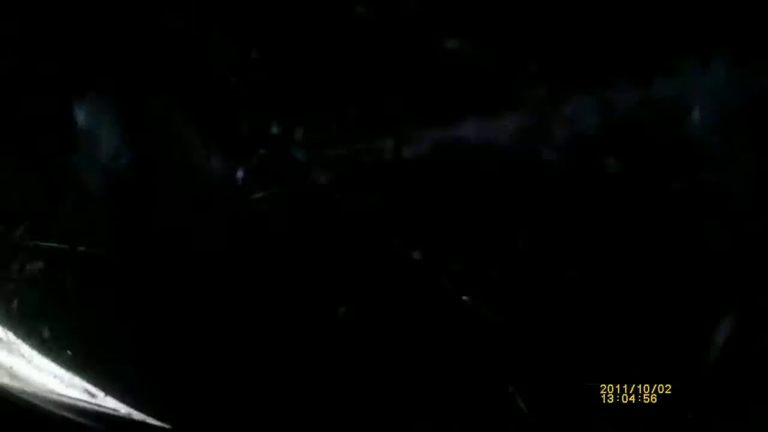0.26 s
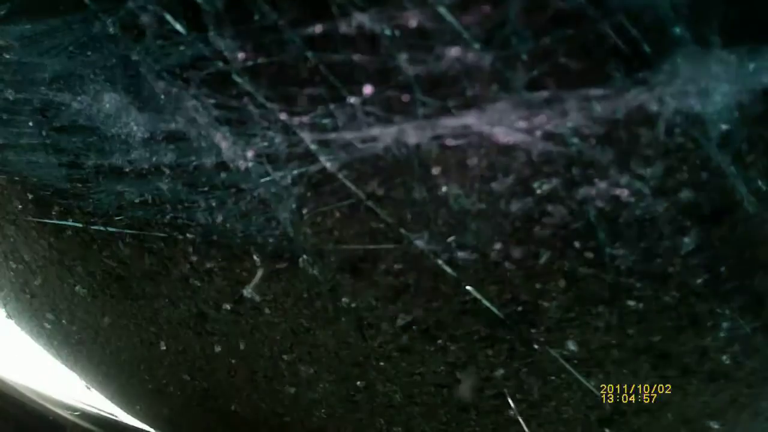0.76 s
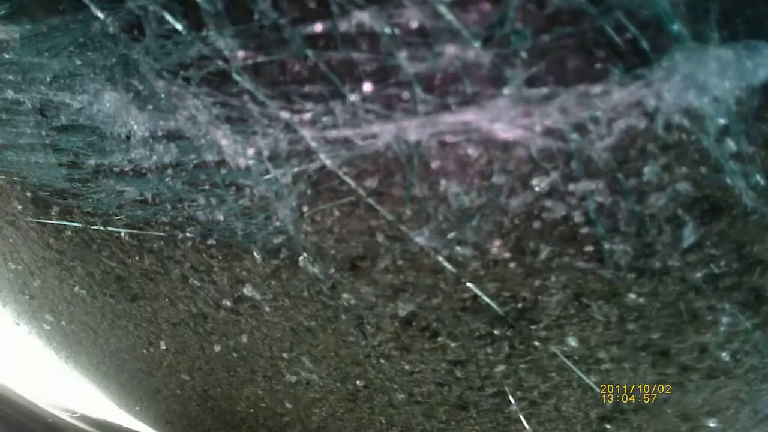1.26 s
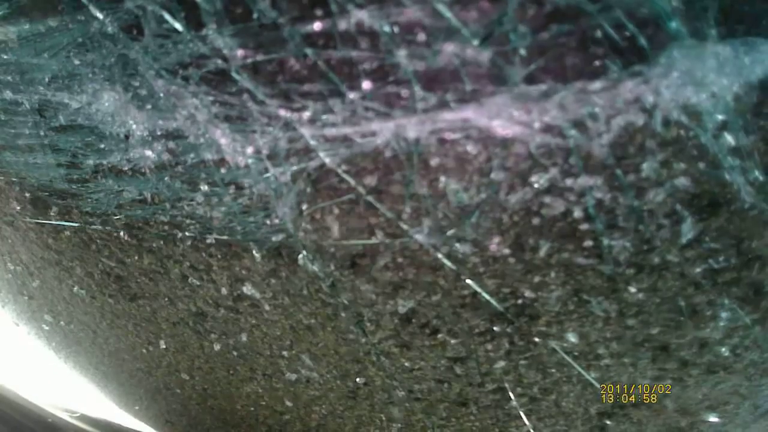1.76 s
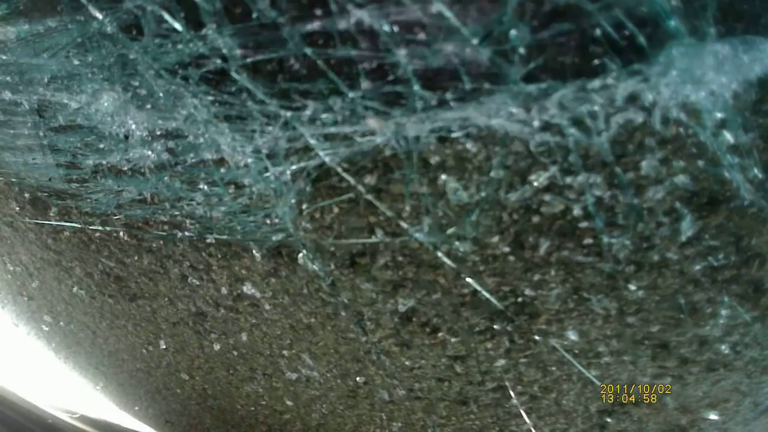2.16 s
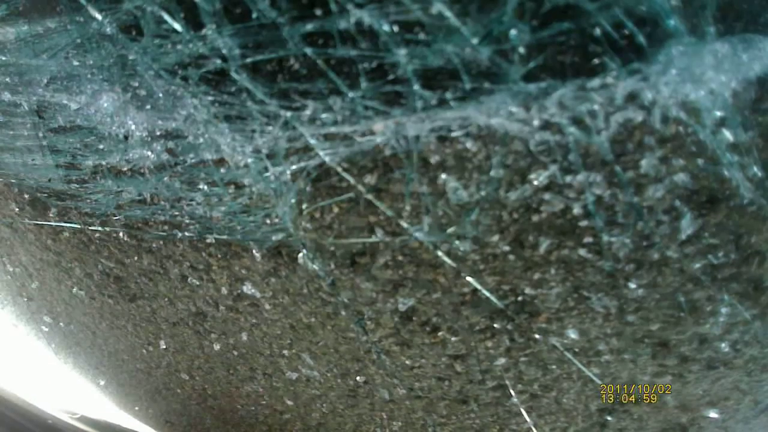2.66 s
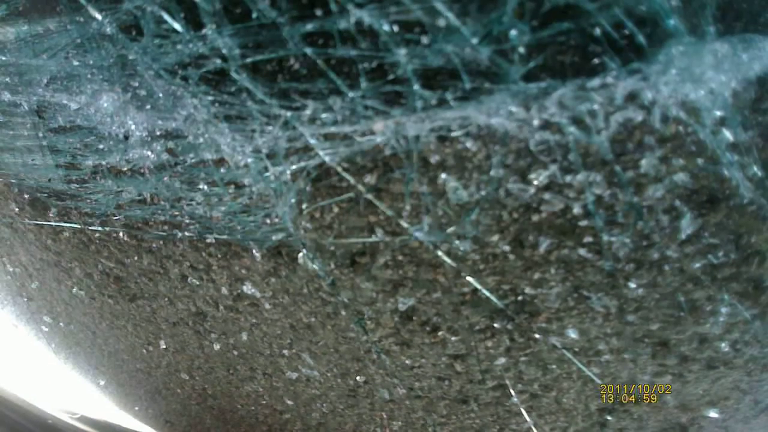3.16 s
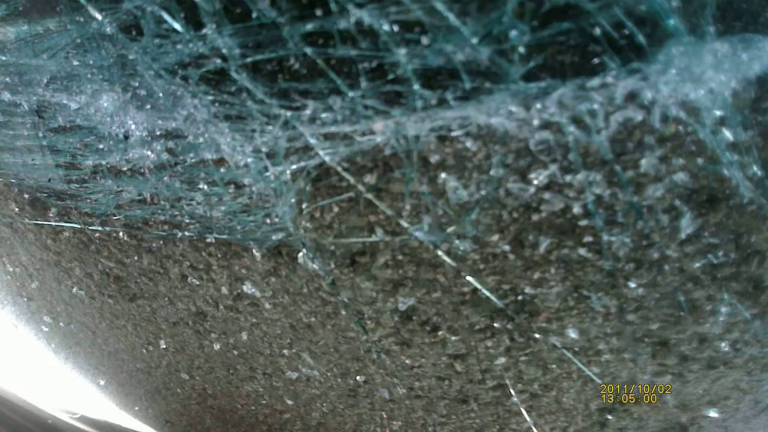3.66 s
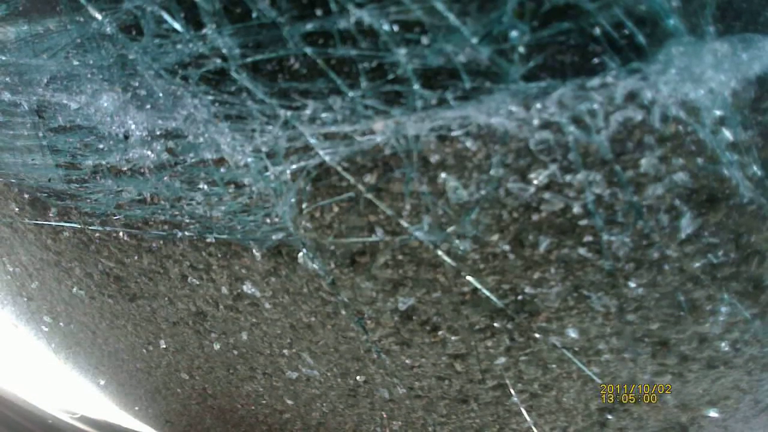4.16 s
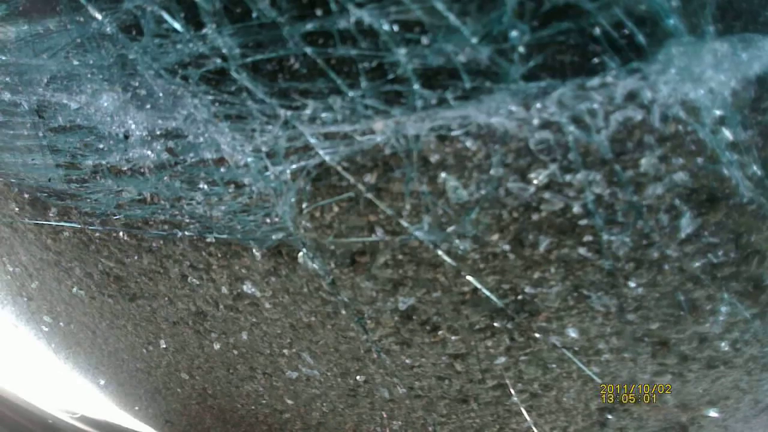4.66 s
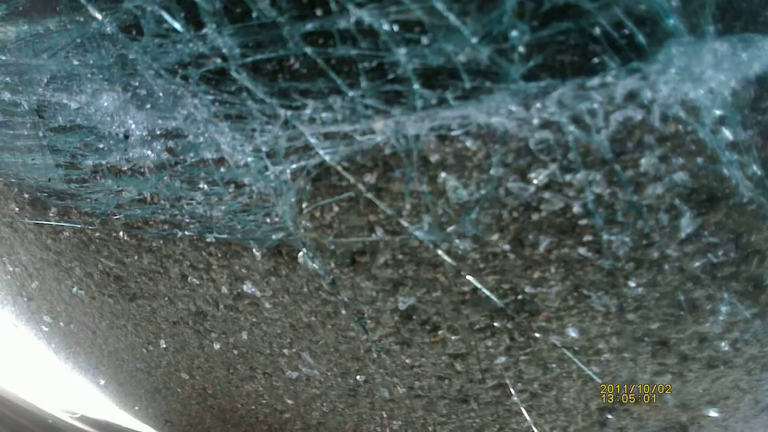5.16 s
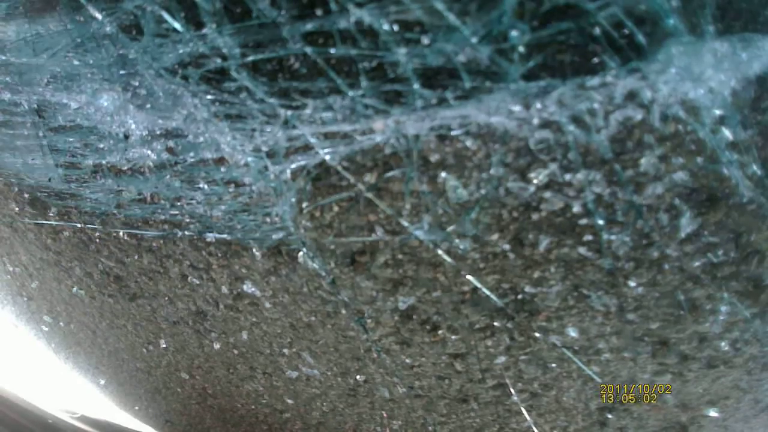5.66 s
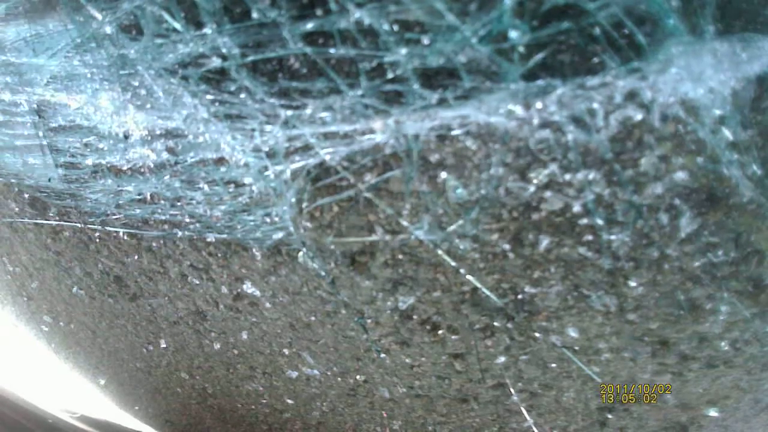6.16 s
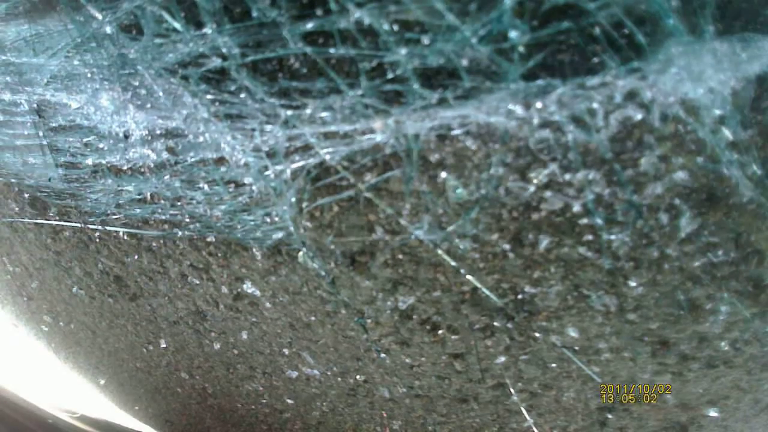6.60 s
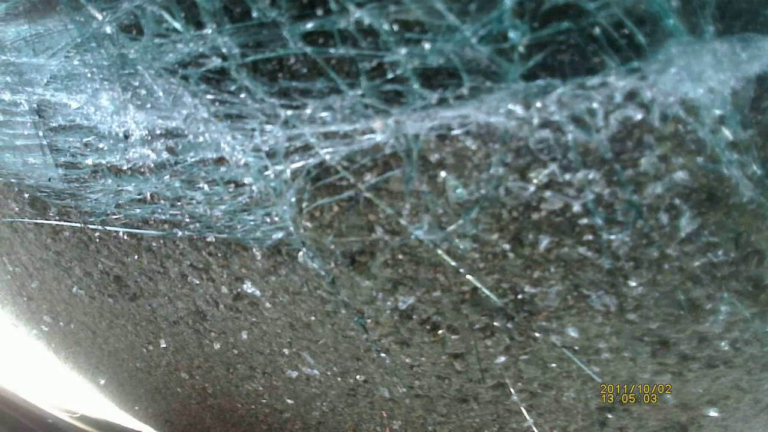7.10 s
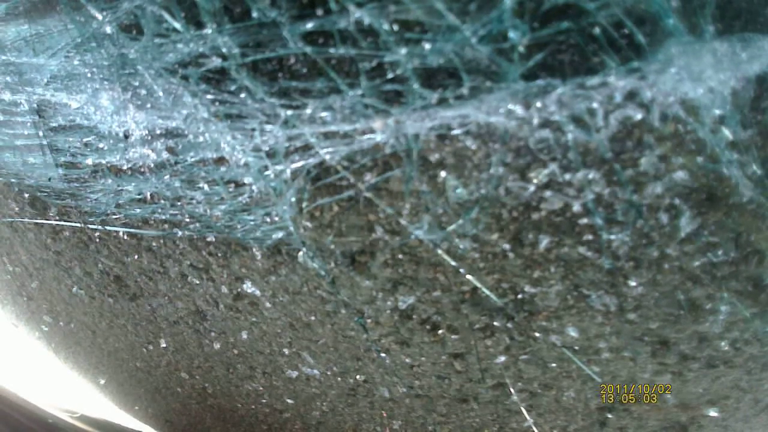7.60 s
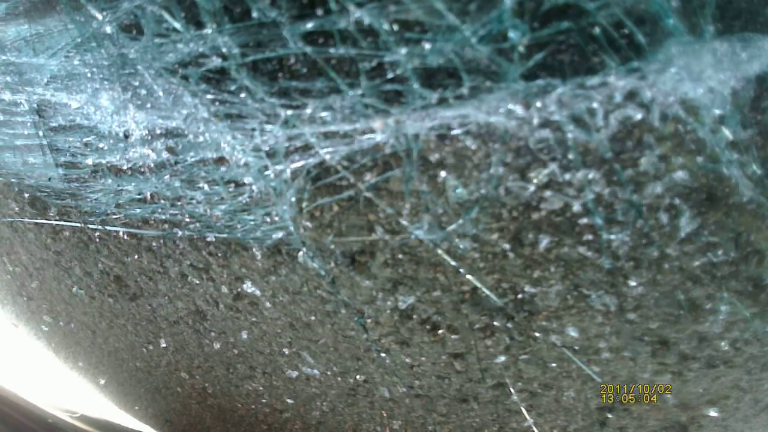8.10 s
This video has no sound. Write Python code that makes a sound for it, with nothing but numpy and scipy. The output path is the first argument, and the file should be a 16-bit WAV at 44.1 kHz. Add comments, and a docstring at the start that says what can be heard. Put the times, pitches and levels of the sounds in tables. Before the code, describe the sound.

A car crashes and grinds harshly along the road, overloading the microphone, then stops as glass trickles and bodywork crunches in distorted bursts.

```python
"""Car crash heard from the cabin

A crashing car grinds along the road and stops: random fractures, filtered by the body, follow its speed.
The wreck crunches in fits of fractures and knocks as damped swings; glass and trim crack as noise and rings.
Glass ticks trickle over a noise wash. The microphone overloads: the crash pins it to one rail, and
loud crunches clip.
"""
import sys
import numpy as np
from scipy import signal
from scipy.fft import rfft, irfft
from scipy.io import wavfile
from scipy.ndimage import uniform_filter1d

SR = 44100
rng = np.random.default_rng(int(sys.argv[2]) if len(sys.argv) > 2 else 0)


def wrap_up_sound(samples):
    """Save the sound to the file named by the first command line argument, as 16-bit audio."""
    columns = np.atleast_2d(samples).T
    # keep every value between -1 and 1, then stretch to whole-number steps
    tamed = np.clip(columns, -1, 1)
    steps = np.round(tamed * 32767).astype(np.int16)
    wavfile.write(sys.argv[1], SR, steps)


N = 367794
TIME = np.arange(N) / SR
STOP_S = 1.693  # the car comes to rest

# Spectrum of rasping torn edges. Each row: frequency in Hz, relative density in dB per Hz.
RASP = [(600, -28), (1200, -12), (1700, -1), (2300, 0), (2800, -1), (3500, -7), (5000, -20), (9000, -50)]
# Spectrum of snapping trim and chips. Each row: frequency in Hz, relative density in dB per Hz.
SNAP = [(30, -12), (100, -24), (300, -8), (700, -4), (1200, 5.5), (1800, -5), (2800, -4), (4000, -26.5),
        (8000, -33)]
# Spectrum of breaking glass. Each row: frequency in Hz, relative density in dB per Hz.
GLASS = [(500, -30), (2000, -14), (3300, -4), (4400, -7), (5700, 0), (7000, -6), (8200, -13), (11000, -60)]
# Resonances of the cabin shell. Each row: centre in Hz, width in Hz, lift in dB.
SHELL = [(700, 60, 4), (905, 80, 5.5), (1160, 120, 3), (2560, 160, 2), (5600, 600, 2.5)]


def slide():
    """Road grit tears at the sliding body in quick uneven catches; torn edges rasp in surges."""
    # Spectrum of the grinding body. Each row: frequency in Hz, relative density in dB per Hz.
    grind_spectrum = [(25, -7.5), (100, -13), (250, -7.5), (600, 0), (1200, 3.5), (1700, -2.5),
                      (2800, -7.5), (4000, -12.5), (5600, -6.5), (7200, -14.5), (8500, -17), (11000, -47.5)]
    grit = shifting(grains(per_s=6000, spread_db=3), patchy_db=1.5)
    catches = amp(3.9 * wander(hz=72.5))
    edges = shifting(grains(per_s=2500, spread_db=3), patchy_db=2.5)
    surges = amp(3 * wander(hz=25))
    body = colour(grit * catches, grind_spectrum, SHELL)
    rasp = amp(-2.5) * colour(unit(edges * surges), RASP)
    return unit(cabin(body + rasp, t60=0.029, wet_db=-4)) * (impact_level() + slide_level())


def impact_level():
    """The first blow crushes the body at full force until the car bounces clear."""
    impact_s, impact_db, bounce_db_per_s = 0.17, 2, 594
    return amp(impact_db - bounce_db_per_s * np.clip(TIME - impact_s, 0, 1))


def slide_level():
    """Grinding follows road load and a power of the evenly falling speed; loose debris scrapes on."""
    land_s, bear_down_s, land_db, slide_db = 0.287, 0.19, -8, 6  # land_db: load at landing, rising to 0
    brake_s, speed_power = 0.32, 1.78
    debris_db, debris_db_per_s = -20.5, 12  # falls only after the stop
    load_db = land_db * np.clip(1 - (TIME - land_s) / bear_down_s, 0, 1)
    speed = np.clip((STOP_S - TIME) / (STOP_S - brake_s), 0, 1)
    grinding = amp(slide_db + load_db) * speed ** speed_power
    debris = amp(debris_db - debris_db_per_s * np.maximum(TIME - STOP_S, 0))
    return (TIME > land_s) * np.hypot(grinding, debris)


def crunches():
    """Clumps of fractures ring the shell and one panel as the wreck shifts; edges rasp and glass splinters."""
    # Fits of crunching bodywork. Each row: start in seconds, swell in seconds, hold in seconds,
    # load in dB before overload, panel ring in Hz, ring lift in dB, rasp gain in dB, splinter gain in dB.
    crunch_rows = [ (0.635, 0.0077, 0.06, 4.5, 2770, -3, -18, -8),
                   (0.94, 0.024, 0.027, -13, 1710, 7, -5, -12),
                   (1.055, 0.013, 0.082, -11, 2170, 15, -1, -2),
                   (1.234, .012, 0.012, -7.5, 2900, 4, -4, 1.5),
                   (1.31, 0.011, 0.023, -18, 2000, 21, -2, -2), (1.577, 0.018, .004, -8, 1140, 1, -9, -6),
                   (2.083, 0.0081, 0.006, -13, 1220, 12, -25, -16),
                   (2.886, 0.012, 0.0095, -11.5, 520, 7, -4.5, -3.5),
                   (4.513, 0.089, 0.044, 2.5, 690, 6.5, -18, -11),
                   (4.743, .005, 0.021, -7.5, 2212, 11, -4.5, -9),
                   (4.823, 0.039, 0.11, -17.5, 1000, -3, -10, -4),
                   (5.006, 0.017, 0.094, -2.5, 960, 1, -17, -3.5),
                   (5.098, 0.074, 0.089, 0.5, 2180, 6, -5, -7.5), (5.282, 0.07, .018, -3, 950, -2, -6, -1),
                   (5.898, 0.08, 0.13, -24, 1000, 1, -6, -5), (6.061, .009, 0.04, -4.5, 1010, 9, -9, -33),
                   (6.098, 0.05, 0.073, 3, 1700, 0, -5, -16), (6.217, .015, 0.044, 2.5, 1150, 7, -21, -23),
                   (6.304, 0.016, 0.021, 0.5, 3200, 2, -7, -3.5),
                   (6.4, .015, 0.13, -27.5, 1150, 1, -4.5, -17),
                   (6.759, 0.0037, 0.0044, 2.5, 940, 4, -11, -8),
                   (6.787, 0.013, 0.057, 2, 936, 12, -6.5, -30), (6.869, 0.026, 0.027, 2, 2400, 2, -5, -16),
                   (6.921, 0.016, 0.046, -3, 1250, 3, -10, -36),
                   (7.048, 0.0038, 0.032, 3.5, 480, 7, -20, -33),
                   (7.101, 0.029, 0.062, -16.5, 890, -7, -2, -5),
                   (7.289, 0.01, 0.061, -4.5, 890, 6.5, -7.5, -32),
                   (7.398, 0.0085, 0.063, -12.5, 776, 8, -8, -32),
                   (7.485, 0.01, 0.015, -11.5, 2770, 9, -4, -32),
                   (7.719, 0.015, 0.06, -12, 850, 5, -15, -30), (7.878, .005, 0.013, -7, 1290, 8, -22, -29),
                   (7.935, 0.0057, 0.0066, -5, 1065, 13, -28, -31)]
    # Spectrum of crunching bodywork. Each row: frequency in Hz, relative density in dB per Hz.
    crunch_spectrum = [(25, -21), (100, -15.5), (180, -5), (300, -2.5), (600, -1.5), (1200, 2), (1700, -4),
                       (2700, -8), (4000, -23), (5600, -15.5), (7200, -34), (8500, -20), (11000, -71)]
    # Spectrum of the booming shell. Each row: frequency in Hz, relative density in dB per Hz.
    boom_spectrum = [(20, 3), (60, -9.5), (110, -4), (250, -22), (1000, -71)]
    # load builds, holds while a panel gives way, then dies
    swell_db, release_db_per_s, boom_db = 23.5, 482, -22.5
    out = np.zeros(N)
    breaks = shifting(grains(per_s=1500, spread_db=3.5), patchy_db=2)
    edges = shifting(grains(per_s=900, spread_db=3.5), patchy_db=2.5)
    splinters = grains(per_s=420, spread_db=2.5)
    boom = unit(colour(rng.standard_normal(N), boom_spectrum))
    # metal sticks and slips, so all three kinds of fracture come in the same spurts
    slips = unit(amp(3.9 * wander(hz=73.5)))
    for s, swell_s, hold_s, db, ring_hz, lift_db, rasp_db, splinter_db in crunch_rows:
        span = (TIME >= s) & (TIME < s + swell_s + hold_s + 0.15)
        t = TIME[span] - s
        rise_db = -swell_db * np.maximum(1 - t / swell_s, 0)
        fall_db = -release_db_per_s * np.maximum(t - swell_s - hold_s, 0)
        load = amp(db + rise_db + fall_db)
        force = slips[span] * load
        panel = (ring_hz, 0.12 * ring_hz, lift_db)
        body = colour(breaks[span] * force, crunch_spectrum, SHELL + [panel])
        rasp = amp(rasp_db) * colour(edges[span] * force, RASP)
        # more force brings disproportionately more glass, growing with force to the power 1.52
        glass = amp(splinter_db) * colour(splinters[span] * force ** 1.52, GLASS)
        add(out, s, body + rasp + glass + amp(boom_db) * boom[span] * load)
    return cabin(out, t60=0.14, wet_db=-8.5)


def cracks():
    """Glass and trim: a sharp snap, a dying noise spray, a brief ring of close modes and a soft thud."""
    # Each row: start in seconds, strength in dB (scales every part), lowest ring in Hz,
    # treble gain in dB before a 5 dB cut, t60 in seconds of the spray.
    crack_rows = [(1.216, 9, 1920, -8, 0.031), (1.243, -3, 5800, -10.5, 0.046),
                  (1.319, -5, 1870, -23, .055), (1.398, -2.5, 2670, -10, .07), (1.453, -8, 5780, -6, .067),
                  (1.493, 3, 2800, -21, 0.022), (1.537, 2, 2640, -12.5, 0.041),
                  (1.596, 11.5, 2640, -9, 0.04), (1.674, -1.5, 1470, -8.5, 0.18),
                  (1.773, -6, 2120, -13, 0.06), (1.909, 1, 1140, -15, 0.064), (1.994, -2, 1510, -24, 0.046),
                  (2.037, -4, 3200, -11.5, 0.12), (2.092, -2, 1300, -12, 0.027),
                  (2.141, -4, 1710, -13.5, 0.12), (2.59, -10, 1630, -6.5, 0.031),
                  (2.71, -3.5, 2760, -10.5, 0.075), (2.76, -10, 2130, -13, 0.06),
                  (2.84, 1, 2010, -25, 0.062), (2.858, -16, 1950, -4.5, 0.081),
                  (2.965, 2.5, 2545, -12, 0.036), (3.126, -8.5, 2600, -11, .044),
                  (3.174, 8, 2060, -22, 0.052), (3.263, -11.5, 2470, -5, 0.091),
                  (3.319, -5.5, 2360, -13, 0.035), (3.592, -10, 1830, -15, 0.046),
                  (3.654, 0.5, 3360, -11.5, 0.027), (3.739, -11.5, 2650, -9, .062),
                  (3.918, -10, 2600, -6.5, 0.024), (4.104, -14, 2530, -6, 0.14),
                  (4.165, -4, 3020, -13, 0.03), (4.359, -21, 1660, 3, 0.039),
                  (4.751, -0.5, 1950, -15, 0.069), (5.023, 12, 2550, -29, 0.048),
                  (5.525, -6, 2810, -17, 0.063), (5.684, -15, 3470, -20, .055),
                  (6.388, 8, 1450, -16.5, 0.061), (6.657, -5, 2610, -10, 0.075),
                  (6.676, 1.5, 3050, -10, 0.052), (7.169, -7, 2000, -8, 0.06),
                  (7.297, 8.5, 2650, -34, 0.12), (7.504, -2.5, 2430, -29, .055),
                  (7.721, -0.5, 1600, -28, 0.086), (7.795, 11, 2380, -28, 0.03),
                  (7.886, 11.5, 1710, -34, 0.089), (7.943, 6, 1570, -36, 0.05),
                  (8.141, 5, 1800, -19, 0.019), (8.203, -4.5, 1720, -18, 0.056),
                  (8.254, 10, 6040, -4.5, 0.013)]
    # small shards ring more clearly: ring gain at 0 dB strength, before an 11 dB cut, and its slope
    base_ring_db, ring_db_per_db = -13, -0.43
    thud_hz, thud_db, thud_t60_s = 65, -26.5, 0.026
    dull, bright, rings = np.zeros((3, N))
    t = TIME[:SR // 5]
    snap = 1 + 1.6 * np.exp(-t / 0.0025)
    thud = amp(thud_db - 60 * t / thud_t60_s) * np.sin(2 * np.pi * thud_hz * t)
    for s, db, hz, treble_db, t60 in crack_rows:
        attack = 1 - np.exp(-t / 0.0003)
        fade = amp(db - 60 * t / t60) * attack
        spray = rng.standard_normal((2, len(t))) * fade * snap
        add(dull, s, amp(-11.5) * spray[0])
        add(bright, s, amp(treble_db - 5) * spray[1])
        # a jagged shard rings with a cluster of close modes
        cluster_hz = hz * rng.uniform(1.0, 1.2, size=(8, 1))
        modes = np.sin(2 * np.pi * cluster_hz * t).sum(axis=0)
        ring_db = min(base_ring_db + ring_db_per_db * db, 0) - 11
        add(rings, s, amp(ring_db) * fade * np.exp(-t / 0.03) * modes)
        add(rings, s, amp(db) * thud)
    pieces = colour(dull, SNAP, SHELL) + colour(bright, GLASS) + rings
    return cabin(pieces, t60=0.059, wet_db=-7)


def thumps():
    """Heavy parts knock: damped swings of panels, unsteady in pitch, with a weaker upper mode."""
    # Each row: start in seconds, initial level of the main swing in dB, mean ring in Hz.
    thump_rows = [(1.245, -9, 346), (2.906, -9, 429), (4.61, 4, 442), (5.025, 0, 459), (5.235, 0.5, 669),
                  (6.108, 2.5, 533), (6.929, 0, 416.6), (7.085, 2.5, 606), (7.11, -2.5, 351),
                  (7.45, -8, 333), (7.887, -17, 69)]
    t60_s = 0.2
    out = np.zeros(N)
    rattle = 1 + 0.2 * wander(hz=140)
    for s, db, hz in thump_rows:
        turns = np.cumsum(hz * rattle[round(s * SR):][:SR // 3]) / SR
        swing = np.sin(2 * np.pi * turns) + 0.25 * np.sin(2 * np.pi * 1.4 * turns)
        add(out, s, amp(db - 60 * TIME[:len(turns)] / t60_s) * swing)
    return out


def stray_chips():
    """Single chips of glass drop: sparse fractures excite the glass spectrum and a broad resonance."""
    per_s, rms_db = 27, -44
    ticks = colour(grains(per_s=per_s, spread_db=-5), GLASS, [(3400, 2600, 9.4)])
    return amp(rms_db) * unit(cabin(ticks, t60=0.031, wet_db=12))


def trickle_level():
    """Crumbs thin out after the stop to a steady trickle, and now and then spill; powers add."""
    # Handfuls of crumbs. Each row: middle in seconds, half length in seconds, level in dB before the mix.
    spill_rows = [(2.39, 0.045, -26.5), (3.243, 0.05, -27), (4.106, 0.092, -37), (5.45, 0.1, -31),
                  (6.6, 0.41, -33), (7.193, 0.12, -24)]
    steady_db, fresh_db, fall_db_per_s = -37, -28, 15  # before the mix
    fresh = amp(fresh_db - fall_db_per_s * np.maximum(TIME - STOP_S, 0))
    spills = sum(amp(db) ** 2 * np.exp(-((TIME - s) / half_s) ** 2) for s, half_s, db in spill_rows)
    return np.sqrt(amp(steady_db) ** 2 + fresh ** 2 + spills)


def bed():
    """A noise wash fills the cabin while fractures filtered as glass crumbs and chips keep ticking."""
    # Spectrum of the wash. Each row: frequency in Hz, relative density in dB per Hz.
    wash_spectrum = [(24, -68), (40, -21.5), (113, -19), (148, -3), (185, -11.5), (236, -5), (336, -5.5),
                     (367, -6), (419, -2), (653, -3.5), (872, -1), (1390, -9), (2260, -15), (3520, -23),
                     (8000, -32.5), (10400, -34.5), (17600, -120)]
    # Resonances that colour the wash. Each row: centre in Hz, width in Hz, lift in dB.
    wash_modes = [(900, 90, 2), (1170, 120, 2), (5650, 650, 5)]
    # Common level of wash and chips. Each row: time in seconds, level in dB before their mix gains.
    wash_level = [(2.4, -21), (3.6, -22.5), (4.9, -21), (5.8, -22.5), (6.7, -19.5), (8.3, -21.5)]
    noise = colour(rng.standard_normal(N), wash_spectrum, wash_modes)
    wash = unit(noise * amp(0.97 * wander(hz=25)))
    crumb_ticks = colour(grains(per_s=900, spread_db=3.8), GLASS, SHELL)
    crumbs = unit(cabin(crumb_ticks, t60=0.025, wet_db=-3))
    chip_ticks = colour(grains(per_s=140, spread_db=-1.5), SNAP, SHELL)
    chips = unit(cabin(chip_ticks, t60=0.024, wet_db=1.5))
    steady = (amp(-1.57) * wash + amp(-9) * chips) * amp(curve(wash_level))
    return steady + amp(-3.5) * crumbs * trickle_level()


def offset():
    """Crash pressure pushes the microphone off its resting point; jolts shove it further and linger."""
    # Each row: start in seconds, length in seconds, push in full-scale units before smoothing and overload.
    jolt_rows = [(0, .008, 2), (.037, .007, 3), (.098, .006, 2.5), (.173, .136, 2.8), (.329, .008, 2.2),
                 (.432, .006, 1.5), (.491, .005, 1.5), (.666, .004, 1.8), (5.083, .008, 1), (5.206, .01, 1),
                 (6.168, .01, 1.5), (6.221, .009, 1.8), (6.306, .012, 2.8), (7.057, .014, 1.8)]
    rest = -0.1  # full-scale units, before overload
    pressure, hold_s, leak_s = 1.1, 0.48, 0.18  # pressure in the same units
    linger, linger_length = 0.29, 0.35  # shares of the jolt's push and length
    out = pressure * np.exp(-np.maximum(TIME - hold_s, 0) / leak_s)
    t = TIME[:SR // 2]
    for s, length_s, push in jolt_rows:
        after = linger * np.exp(-np.maximum(t - length_s, 0) / (linger_length * length_s))
        add(out, s, push * np.where(t < length_s, 1, after))
    return rest + uniform_filter1d(out, size=130)


def shifting(x, patchy_db, size=1024):
    """The point of contact keeps moving, so other panel resonances swell and fade by turns."""
    z = signal.stft(x, nperseg=size, noverlap=size * 3 // 4)[2]
    patches = rng.standard_normal(z.shape)
    for _ in range(2):
        patches = uniform_filter1d(patches, size=6, axis=0)  # over frequency
        patches = uniform_filter1d(patches, size=7, axis=1)  # over time
    z = z * amp(patchy_db * unit(patches))
    return unit(signal.istft(z, nperseg=size, noverlap=size * 3 // 4)[1][:N])


def grains(per_s, spread_db):
    """Random tiny fractures of either sign, exponentially spread in dB; a negative spread shrinks a few."""
    size = amp(spread_db * np.minimum(rng.exponential(1, N), 4))
    return unit(size * rng.choice([-1, 1], N) * (rng.random(N) < per_s / SR))


def wander(hz):
    """Slow random motion of rms 1, mostly below hz."""
    f = np.fft.rfftfreq(N, 1 / SR)
    return unit(irfft(rfft(rng.standard_normal(N)) / (1 + (f / hz) ** 4), N))


def cabin(x, t60, wet_db, size=4000):
    """Adds the quick, dense reflections of the small cabin: sparse random taps decaying over t60 seconds."""
    t = TIME[:size]
    taps = rng.choice([-1, 1], size) * (rng.random(size) < 2000 / SR) * amp(-60 * t / t60)
    echo = signal.oaconvolve(x, taps / np.linalg.norm(taps))[:N]
    return (x + amp(wet_db) * echo) / np.sqrt(1 + amp(2 * wet_db))


def colour(x, points, modes=(), size=4096):
    """Minimum-phase filter of unit energy: a broad spectrum with resonances on top."""
    hz = np.abs(np.fft.fftfreq(size, 1 / SR))
    f, db = np.transpose(points)
    db = np.interp(np.log(hz + 1), np.log(f), db)
    for centre, width, lift in modes:
        db = db + lift / (1 + (2 * (hz - centre) / width) ** 2)
    response = np.exp(np.conj(signal.hilbert(np.log(amp(db)))))
    taps = np.fft.ifft(response).real[:size // 2]
    return signal.oaconvolve(x, taps / np.linalg.norm(taps))[:len(x)]


def lowpass(x, hz, size):
    """Linear-phase FIR low-pass."""
    return signal.oaconvolve(x, signal.firwin(size, hz, window=("kaiser", 9), fs=SR), "same")


def amp(db):
    """Decibels to gain."""
    return 10 ** (np.asarray(db) / 20)


def unit(x):
    """Scales to rms 1."""
    return x / np.sqrt(np.mean(x ** 2) + 1e-20)


def curve(rows, axis=1):
    """One column of a table, joined by straight lines in time."""
    rows = np.array(rows)
    return np.interp(TIME, rows[:, 0], rows[:, axis])


def add(mix, s, sound):
    """Mixes a sound in at s seconds."""
    part = mix[max(round(s * SR), 0):][:len(sound)]
    part += sound[:len(part)]


def scene():
    """All sound reaching the microphone."""
    return (slide() + crunches() + cracks() + thumps() + bed() + stray_chips())[None]


def record(dry):
    """The offset signal hits the rails, is band-limited with two faint steady tones added, and clips again."""
    # Ticks as the pinned microphone slips off its rail.
    # Each row: start in seconds, depth in full-scale units before the low-pass.
    tick_rows = [(0.2499, 0.31), (.296, 0.17)]
    # Two faint steady high tones. Each row: frequency in Hz, rms level in dB where not overloaded.
    tone_rows = [(7758, -51), (8242, -57)]
    rail = 0.715  # full-scale units
    recorder_hz, edge_hz = 8050, 16000  # low-pass cutoffs
    drive = (dry[0] + offset()) / rail
    railed = rail * drive / (1 + drive ** 8) ** (1 / 8)
    for s, depth in tick_rows:
        add(railed, s, -depth * np.hanning(9))
    tones = sum(amp(db) * np.sqrt(2) * np.sin(2 * np.pi * hz * TIME) for hz, db in tone_rows)
    # the tones stop during overload
    narrow = lowpass(railed, recorder_hz, size=91) + tones * (abs(drive) < 1)
    return lowpass(np.clip(narrow, -rail, rail), edge_hz, size=401)[None]


dry = scene()
out = record(dry)
wrap_up_sound(out)
```